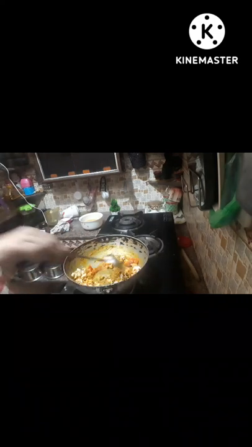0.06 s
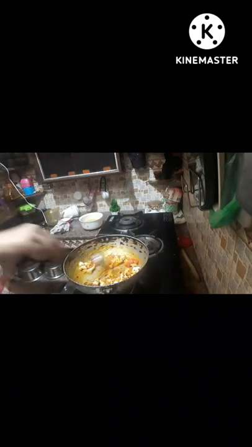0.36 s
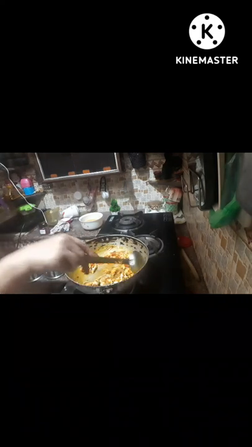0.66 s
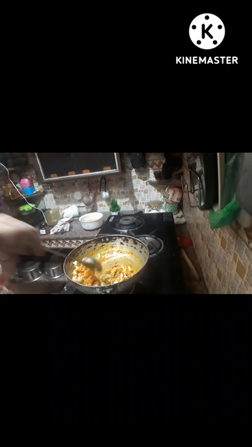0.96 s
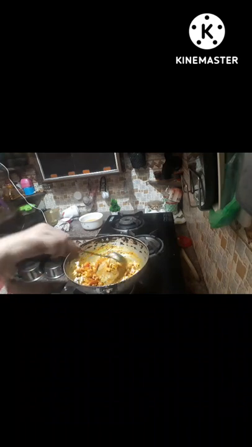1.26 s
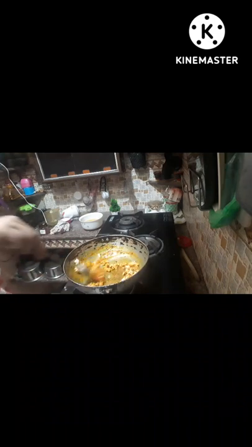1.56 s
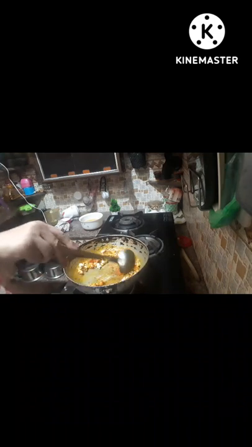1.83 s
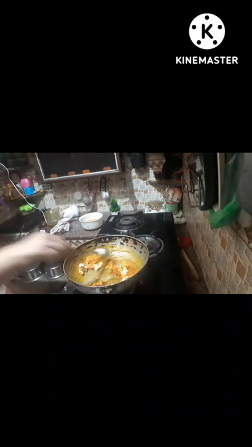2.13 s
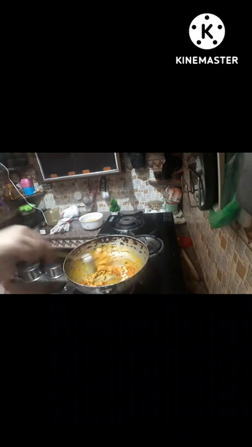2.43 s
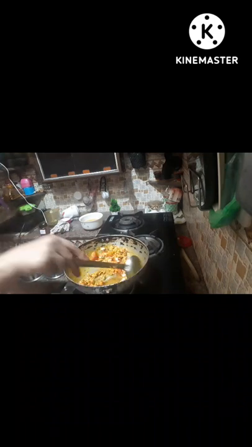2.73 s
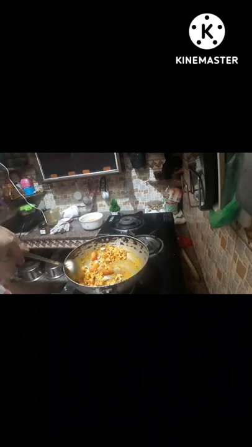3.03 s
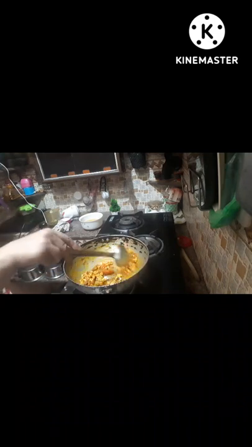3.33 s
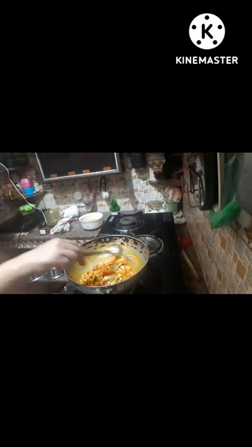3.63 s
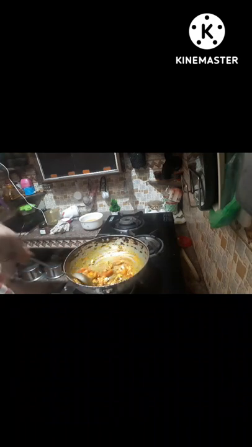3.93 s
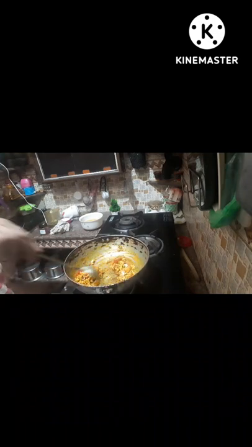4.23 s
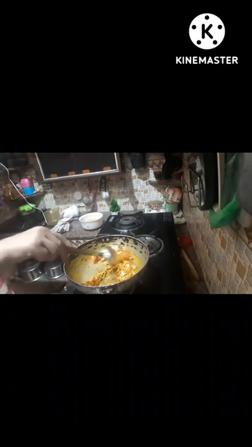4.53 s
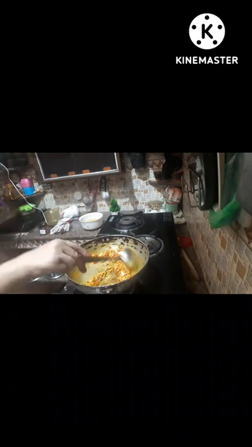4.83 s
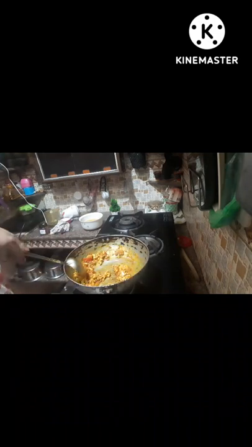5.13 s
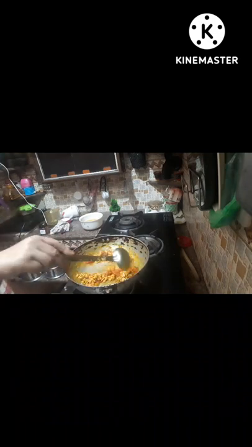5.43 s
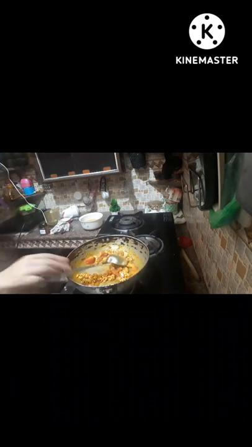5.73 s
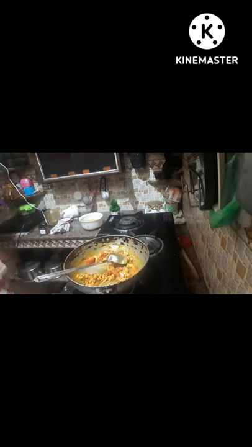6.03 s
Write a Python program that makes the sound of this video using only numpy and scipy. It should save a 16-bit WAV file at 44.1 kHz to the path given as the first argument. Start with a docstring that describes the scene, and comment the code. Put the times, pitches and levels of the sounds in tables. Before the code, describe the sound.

Repeated metal clanks and short scrapes of a ladle going round a pan, with food frying faintly underneath.

```python
"""A steel ladle stirs frying food round a steel pan on a stove in a small tiled kitchen.
Each knock is an impulse that excites the normal modes of pan and ladle, which ring briefly, damped by
the food; the pan also rocks with a dull thud. Dragged along the wall, the ladle rasps and groans by
stick-slip friction. Underneath, steam and bursting bubbles sizzle softly over room noise and a hum."""
import sys
import numpy as np
from scipy import signal
from scipy.fft import rfft, irfft
from scipy.io import wavfile
from scipy.ndimage import uniform_filter1d

SR = 44100
rng = np.random.default_rng(int(sys.argv[2]) if len(sys.argv) > 2 else 0)


def generate_wav(signal):
    """Clip the signal to [-1, 1] and save it as 16-bit WAV at the path in sys.argv[1]."""
    frames = np.transpose(np.atleast_2d(signal))
    scaled = np.clip(frames, -1, 1) * 32767
    pcm = np.round(scaled).astype(np.int16)
    wavfile.write(sys.argv[1], SR, pcm)


N = 277386
TIME, RING_TIME = np.arange(N) / SR, np.arange(int(.45 * SR)) / SR
GRID_HZ = np.geomspace(60, 16500, 300)

# The pan's five registers: thud, bowl, clank, clink, tick. Each row: lower and upper edge in Hz,
# build-up in seconds, T60 of the weak modes in seconds, their level against the strong modes in dB.
REGISTER_BANDS = [(70, 706, 0.0038, 0.27, 0.5), (620, 1200, 0.0049, 0.23, -1.5),
                  (1314, 4200, 0.0033, 0.19, 2.5), (3070, 6450, 0.0036, 0.11, 11),
                  (6040, 16500, 0.002, 0.12, 9)]
# Strong modes of the pan. Each row: frequency in Hz, level in dB.
PAN_MODES = [(250, -7.5), (290, -5), (322, 3.5), (365, 0), (418, -19), (446, 4), (548, -6), (701, -6),
             (785, 3), (815, 6.5), (865, 3), (914, -1), (1378, 3), (1530, 2.5), (1620, 1), (1776, -5),
             (1845, 1.5), (2016, -9), (2150, -21), (2480, 0), (2908, -2), (3900, -4), (4520, 8.5),
             (5263, 1), (6011, 9), (7126, 7), (8300, 8), (9040, 8), (9965, -23.5)]
# Modes of the ladle and its handle. Each row: frequency in Hz, relative level in dB, T60 in seconds.
LADLE_MODES = [(863, -7, 0.25), (1329, 18.5, 0.21), (1388, 22.5, 0.18), (1880, 8.5, 0.22),
               (2640, 19, 0.032), (3460, 9, .13)]
HANDLE_MODES = [(5264, 0, 0.23), (5460, -9, 0.28), (6005, 0, 0.24), (7127, -5, 0.34), (8310, -4, .17),
                (9040, 3, .12)]
# Spectra of the pan's weak modes, the sizzle and the room. Each row: frequency in Hz, gain in dB.
WEAK_SPECTRUM = [(60, -25), (110, 1), (160, -21.5), (220, -0.5), (330, 2), (460, 5), (600, -6), (900, -5.5),
                 (1150, -4), (1800, -3), (2800, -11), (4800, -15.5), (9000, 0.5), (11700, -4), (12500, -9),
                 (16000, -18)]
SIZZLE_SPECTRUM = [(1800, -1), (2500, -3), (3000, -4), (4000, -5), (6900, -4), (7600, -6.5), (9000, 1),
                   (9700, -2.5), (11600, -2.5), (12500, -6.5), (15000, -9.5), (16000, -10)]
ROOM_SPECTRUM = [(25, -10), (50, -15), (75, -11), (105, -1), (135, -5.5), (160, -16), (195, -5.5),
                 (256, -7.5), (341, -10), (470, -12.5), (600, -13), (790, -5.5), (962, -14), (1400, -10),
                 (1800, -16)]
# Partials of the hum. Each row: frequency in Hz, level in dB.
HUM_PARTIALS = [(100, -74), (197, -61.5), (253, -59), (478, -61)]
# Balance of each kind of contact. Each entry: one register's offset in dB, from thud to tick.
TAP_BALANCE = (0.5, 0, 0, -5.5, -10)
ROCK_BALANCE = (-1.5, -10.5, -13, -19.5, -17.5)
KNOCK_BALANCE = (-2, -3, 1, -3.5, -3)
DRAG_BALANCE = (1, -2, -2, -5, -5.5)
# Bare steel is bright, food is dull. Each entry: one register's gain in dB per dB of brightness.
BRIGHTNESS_SLOPES = (0.056, 0.022, 0.11, 0.89, 1.06)
# The ladle taps the far wall and bounces clear. Each row: start in seconds, strength in dB,
# brightness in dB, ladle ring in dB, clank pitch in Hz.
WALL_TAPS = [(0, -32, 2, -33, 1120), (0.685, -27.5, -7, -32, 1150), (1.965, -24.5, 0, -21.5, 1320),
             (2.761, -24.5, 2, -24, 1360), (3.542, -28, -2, -28, 1880), (4.827, -37, 1, -53, 1910),
             (5.263, -41.5, 4, -35, 1315)]
# The ladle drives food into the wall. Each row: start in seconds, strength in dB, thud in dB,
# brightness in dB, ladle ring in dB, clank pitch in Hz, tick pitch in Hz.
WALL_KNOCKS = [(.374, -22.5, -20.5, -3, -29, 1460, 5460), (.774, -35, -18, 5.5, -46, 2660, 11600),
               (.88, -39, -53, -3, -40, 1480, 5210), (1.161, -17.5, -26.5, -8, -20.5, 1960, 4100),
               (1.532, -29, -48, 8.5, -25, 2110, 9600), (1.548, -26, -27.5, 3, -40, 2010, 9070),
               (2.068, -29, -18.5, -3, -37, 2650, 4050), (2.409, -25.5, -45, 3.5, -35, 1970, 4000),
               (2.837, -21, -14, 1, -40, 1070, 11600), (3.165, -26.5, -39, -15, -48, 1620, 7920),
               (3.214, -26.5, -27, -2.5, -44, 1680, 4930), (3.624, -28, -19, -14, -42, 2410, 6250),
               (3.636, -30, -33, 4, -45, 2380, 6250), (4.063, -19.5, -16.5, -0.5, -26, 2680, 5630),
               (4.434, -19, -40, -3.5, -43, 1960, 9040), (4.883, -29, -19, 6, -38, 2690, 5800),
               (5.319, -28.5, -24.5, 2, -31, 2300, 8700), (5.715, -18.5, -20, -3, -30, 1700, 4570),
               (5.728, -24.5, -52, -7, -40, 1700, 7400), (5.838, -23, -26, 5.5, -26.5, 2680, 7700),
               (5.869, -22, -21, -1.5, -20.5, 1410, 6050), (5.891, -21, -54, -11, -31, 1400, 3420)]
# The pan rocks on the stove. Each row: start in seconds, strength in dB, brightness in dB.
PAN_ROCKS = [(.309, -33.5, -9), (2.123, -33.5, 5), (2.427, -32.5, -1), (2.514, -27, -9), (3.328, -32.5, -8),
             (3.709, -27, 7.5), (4.02, -36.5, -3), (4.498, -30.5, 8)]
# The ladle drags along the wall. Each row: start in seconds, length in seconds, strength in dB,
# thud in dB, brightness in dB, groan in dB, groan pitch in Hz.
WALL_DRAGS = [(0.373, 0.022, -23, -30, -1.5, -18, 818), (0.752, 0.04, -32, -36, -3, -24.5, 803),
              (.79, 0.063, -35.5, -34.5, -12, -24, 812), (1.173, 0.036, -22.5, -27, 0.5, -24.5, 823),
              (1.556, 0.077, -23, -32, -4.5, -21.5, 812), (1.614, 0.076, -37.5, -38, 7, -47, 818),
              (2.077, 0.052, -33.5, -40, -3, -26, 815), (2.409, 0.02, -48, -44, 2, -26, 865),
              (2.839, 0.022, -24.5, -38, -1, -33, 812), (2.883, 0.029, -26, -55, -7, -26, 818),
              (3.175, 0.045, -26, -35, -2.5, -43, 812), (3.218, 0.038, -26.5, -34, 5.5, -54, 790),
              (3.635, .021, -32.5, -30.5, -6, -31.5, 812), (4.065, 0.027, -29, -33, 4, -57, 785),
              (4.436, 0.037, -35.5, -33.5, 10, -23.5, 805), (4.886, 0.013, -27, -57, -0.5, -23, 818),
              (5.327, 0.077, -28.5, -33.5, 0, -34, 812), (5.718, 0.025, -22.5, -41, -5, -19.5, 885),
              (5.845, .074, -19, -39, -1.5, -26, 810)]

TAP_TICK_HZ, RIM_TICK_HZ, ROCK_CLANK_HZ = 3280, 8600, 1370  # centres of strongest excitation
KITCHEN_T60_S, KITCHEN_TAIL_DB = 0.39, -17.5


def impacts(drop_s=5.84, drop_db=-18):
    """Impulsive excitation: the ladle taps and knocks, the pan rocks, and the dropped ladle rings."""
    out = np.zeros(N)
    for start, db, brightness_db, ladle_db, clank_hz in WALL_TAPS:
        levels = register_levels(TAP_BALANCE, db, db, brightness_db)
        add(out, start, strike(levels, (clank_hz, TAP_TICK_HZ)) + ladle(ladle_db))
    for start, db, thud_db, brightness_db, ladle_db, clank_hz, tick_hz in WALL_KNOCKS:
        levels = register_levels(KNOCK_BALANCE, db, thud_db, brightness_db)
        add(out, start, strike(levels, (clank_hz, tick_hz)) + ladle(ladle_db))
    for start, db, brightness_db in PAN_ROCKS:
        levels = register_levels(ROCK_BALANCE, db, db, brightness_db)
        add(out, start, strike(levels, (ROCK_CLANK_HZ, RIM_TICK_HZ)))
    handle = free_modes(HANDLE_MODES, detune=0, scatter_db=-3)
    add(out, drop_s, contact(handle, drop_db))
    return out


def strike(levels, pitches, crack_db=-3, crack_s=0.0036, cushion=0.81, linger_hz=478):
    """Transient response: a blow rings every register; food cushions the crack of a heavy push."""
    thud_db, _, clank_db, *_ = levels
    cushioned_db = crack_db - cushion * max(thud_db - clank_db, 0)
    lingering = decay(t60=0.44) * np.sin(2 * np.pi * linger_hz * RING_TIME)  # hardly damped by food
    out = contact(lingering, thud_db - 11.5)
    for k, (register, db) in enumerate(zip(REGISTER_BANDS, levels)):
        sound = pan(register, pitches)
        if k >= 2:  # clank, clink and tick open with a crack
            crack = unit(weak_modes(register, pitches) * np.exp(-RING_TIME / crack_s))
            sound = sound + undb(cushioned_db) * crack
        out = out + contact(sound, db)
    return out


def pan(register, pitches, strong_t60_ratio=0.64):
    """Impulse response of one register: strong modes among many weak ones build up and decay."""
    lo_hz, hi_hz, rise_s, t60, weak_db = register
    modes = [(hz, db + coupling(hz, pitches), strong_t60_ratio * t60)
             for hz, db in PAN_MODES if lo_hz <= hz < hi_hz]
    strong = free_modes(modes, detune=0.00081, scatter_db=7.5)
    weak = unit(weak_modes(register, pitches) * decay(t60))
    build_up = (1 - np.exp(-2 * RING_TIME / rise_s)) ** 2
    return unit((strong + undb(weak_db) * weak) * build_up)


def ladle(db, rise_s=0.0038):
    """Free vibration: the ladle rings in its own modes after a contact."""
    ringing = free_modes(LADLE_MODES, detune=0.0086, scatter_db=-0.5)
    return contact(ringing * (1 - np.exp(-RING_TIME / rise_s)), db)


def free_modes(modes, detune, scatter_db):
    """Modal superposition: damped sinusoids, weighted and detuned anew at each point of contact."""
    out = 0
    for (hz, db, t60), (bend, weight, phase) in zip(modes, rng.uniform(-1.067, 1, (len(modes), 3))):
        wave = np.sin(2 * np.pi * (hz * (1 + detune * bend) * RING_TIME + phase))
        out = out + undb(db + scatter_db * weight) * decay(t60) * wave
    return unit(out)


def weak_modes(register, pitches):
    """Modal overlap: countless weak modes merge into a band of noise with clusters and gaps."""
    clusters_db = rng.uniform(-8, 8, len(GRID_HZ)) * np.minimum(GRID_HZ / 2000, 1)
    hz, db = np.transpose(WEAK_SPECTRUM)
    gain_db = np.interp(np.log(GRID_HZ), np.log(hz), db) + coupling(GRID_HZ, pitches) + clusters_db
    return colour(rng.standard_normal(len(RING_TIME)), np.c_[GRID_HZ, gain_db], *register[:2])


def coupling(hz, pitches, clank_width_hz=190, tick_width_hz=330):
    """Modal coupling, in dB: a contact drives the modes near its clank and tick pitches hardest."""
    clank_hz, tick_hz = pitches
    clank_db = 8 / (1 + ((hz - clank_hz) / clank_width_hz) ** 2)
    tick_db = 6 / (1 + ((hz - tick_hz) / tick_width_hz) ** 2)
    return clank_db + tick_db


def register_levels(balance, db, thud_db, brightness_db):
    """Energy partition, in dB: the push sets the thud, the blow the rest; brightness tilts them."""
    return np.array([thud_db, db, db, db, db]) + balance + brightness_db * np.array(BRIGHTNESS_SLOPES)


def scrapes(slips_per_s=480, spread_db=5, rasp=0.16):
    """Stick-slip friction: the ladle's rim drives the pan with a swelling burst of uneven impulses."""
    out = np.zeros(N)
    for start, length, drag_db, thud_db, brightness_db, groan_db, groan_hz in WALL_DRAGS:
        n = int(length * SR)
        # a drag rubs the same spot as the nearest knock
        *_, clank_hz, _ = min(WALL_KNOCKS, key=lambda knock: abs(knock[0] - start - length / 2))
        pitches = (clank_hz, RIM_TICK_HZ)
        pressure = np.sqrt(np.sin(np.pi * np.arange(n) / n))
        chance, size = rng.random((2, len(RING_TIME)))[:, :n]
        slips = pressure * (chance < slips_per_s / SR) * undb(-spread_db * np.log(size + 0.036))
        # the slips partly fall in step with the modes, giving the rasp a pitch
        force = colour(slips, np.c_[GRID_HZ, rasp * coupling(GRID_HZ, pitches)])
        levels = register_levels(DRAG_BALANCE, drag_db, thud_db, brightness_db)
        for register, db in zip(REGISTER_BANDS, levels):
            add(out, start, contact(signal.fftconvolve(force, pan(register, pitches)), db))
        easing_pressure = pressure * np.linspace(1, .5, n)
        add(out, start, contact(groan(easing_pressure, groan_hz), groan_db))
    return out


def groan(pressure, hz, phase_step_rad=0.024, octave_db=-22):
    """Mode locking: the slips lock to one mode of the bowl, which sings with an unsteady pitch."""
    n = len(pressure)
    steady_phase = 2 * np.pi * hz * RING_TIME
    drift = phase_step_rad * np.cumsum(rng.standard_normal(len(RING_TIME)))
    phase = (steady_phase + drift)[:n]
    mode = decay(t60=.12) * np.sin(steady_phase)
    tone = unit(signal.fftconvolve(pressure * np.sin(phase), mode))
    tone[:n] += undb(octave_db) * unit(pressure * np.sin(2 * phase))
    return tone


def decay(t60):
    """Exponential damping: a free decay plus the weak reverberant tail of the tiled room."""
    exponent = -np.log(1000) * RING_TIME
    return np.exp(exponent / t60) + undb(KITCHEN_TAIL_DB) * np.exp(exponent / KITCHEN_T60_S)


def sizzle(pops_per_s=2500, spread_db=3, flutter_db=0.55):
    """Flow noise and shot noise: steam hisses from the food and tiny bubbles burst in the oil."""
    sizes = undb(spread_db * np.minimum(rng.exponential(size=N), 6)) * rng.choice([-1, 1], N)
    pops = at_rms((rng.random(N) < pops_per_s / SR) * sizes, db=-4)
    steam = rng.standard_normal(N)
    hiss = at_rms(colour(steam + pops, SIZZLE_SPECTRUM, lo_hz=1840), db=-47)
    return hiss * undb(flare() + flutter_db * waver(14))


def flare(peak_db=2.5, peak_s=0.082):
    """Flash boiling: each drag turns wet food onto hot steel, and the sizzle's gain in dB swells."""
    ages = [np.maximum(TIME - start, 0) / peak_s for start, *_ in WALL_DRAGS]
    return peak_db * np.max([age * np.exp(1 - age) for age in ages], axis=0)


def kitchen(waver_db=2, wander_rad=0.55):
    """Ambient noise: a low rush, and a hum under random phase and amplitude modulation."""
    air = at_rms(colour(rng.standard_normal(N), ROOM_SPECTRUM, hi_hz=1890), db=-48.5)
    air *= undb(0.23 * waver(4.8))
    hum = 0
    for hz, db in HUM_PARTIALS:
        partial = np.sin(2 * np.pi * hz * TIME + wander_rad * waver(16))
        hum = hum + at_rms(partial, db) * undb(waver_db * waver(11))
    return air + hum


def waver(steps_per_s):
    """Random modulation: held values, smoothed twice, at unit rms."""
    hold = int(SR / steps_per_s)
    steps = np.repeat(rng.standard_normal(N // hold + 1), hold)
    return at_rms(uniform_filter1d(uniform_filter1d(steps, hold), hold)[:N], 0)


def colour(x, spectrum, lo_hz=20, hi_hz=SR / 2):
    """Spectral shaping: filter by (Hz, dB) points between two steep edges."""
    f = np.maximum(np.fft.rfftfreq(len(x), 1 / SR), 1)
    hz, db = np.transpose(spectrum)
    edges = 1 / np.sqrt((1 + (lo_hz / f) ** 20) * (1 + (f / hi_hz) ** 20))
    return irfft(rfft(x) * undb(np.interp(np.log(f), np.log(hz), db)) * edges, len(x))


def undb(db):
    """Decibels to amplitude ratio."""
    return 10 ** (np.asarray(db) / 20)


def unit(x):
    """Normalisation to unit energy."""
    return x / np.sqrt(np.sum(x ** 2) + 1e-18)


def at_rms(x, db):
    """Normalisation to an rms level."""
    return unit(x) * np.sqrt(len(x)) * undb(db)


def contact(x, db):
    """Equivalent level: x gets the energy of 30 ms at this rms level."""
    return unit(x) * undb(db) * np.sqrt(.03 * SR)


def add(out, start, x):
    """Superposition: mix x in at start seconds."""
    i = int(start * SR)
    out[i:i + len(x)] += x[:N - i]


def scene(radiates_from_hz=135):
    """Radiation efficiency: the small pan sheds little deep bass; sizzle and room lie beneath it."""
    radiation = signal.butter(3, radiates_from_hz, "high", fs=SR, output="sos")
    stirring = signal.sosfilt(radiation, impacts() + scrapes())
    return (stirring + sizzle() + kitchen())[None]


def record(dry, bass_hz=45, top_hz=15650):
    """Band limiting and saturation: thin the deep bass, clip at full scale and cut the top."""
    thin = signal.sosfilt(signal.butter(2, bass_hz, "high", fs=SR, output="sos"), dry)
    return signal.sosfilt(signal.ellip(10, .2, 70, top_hz, fs=SR, output="sos"), np.clip(thin, -1, 1))


dry = scene()
out = record(dry)
generate_wav(out)
```